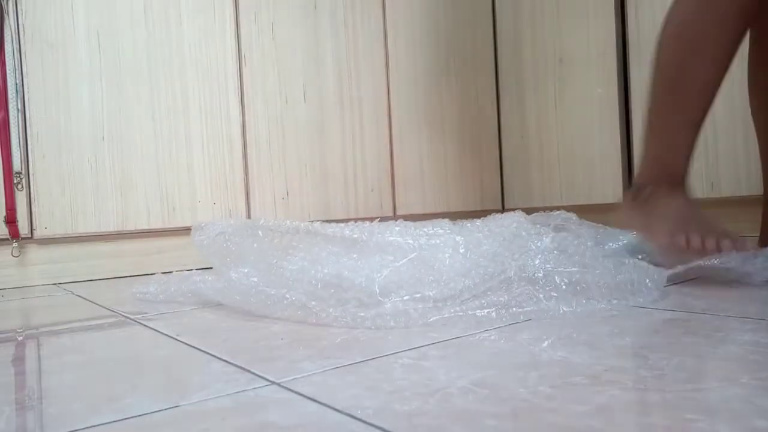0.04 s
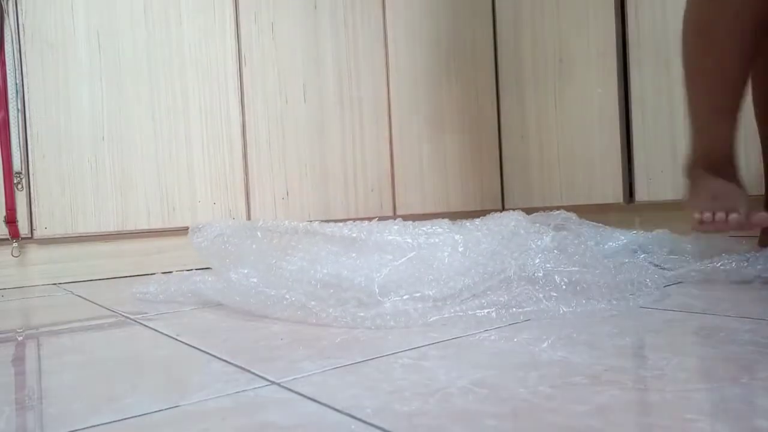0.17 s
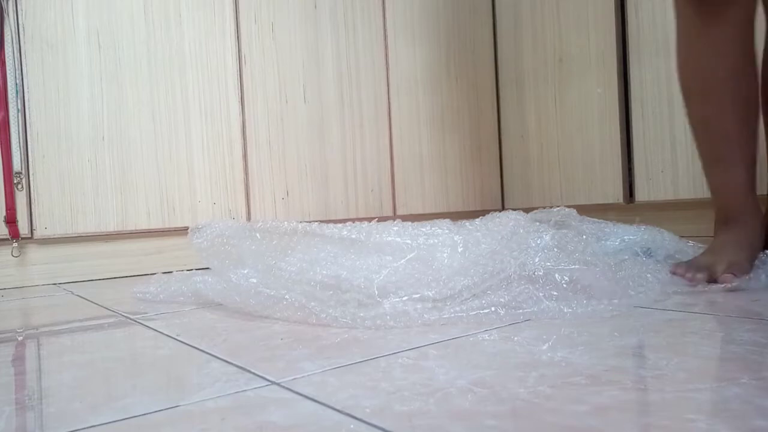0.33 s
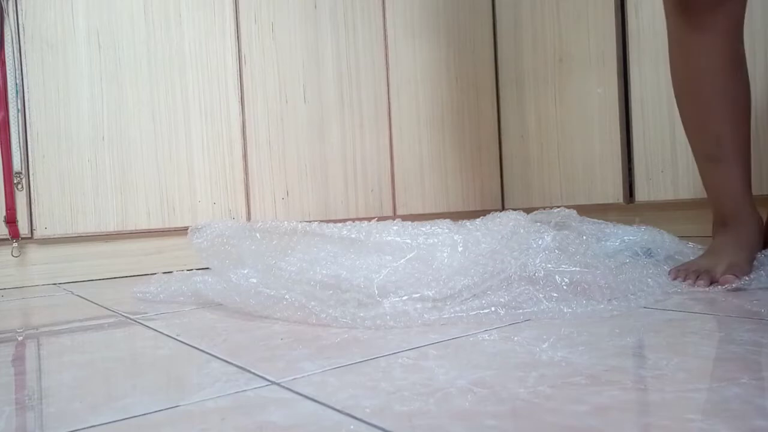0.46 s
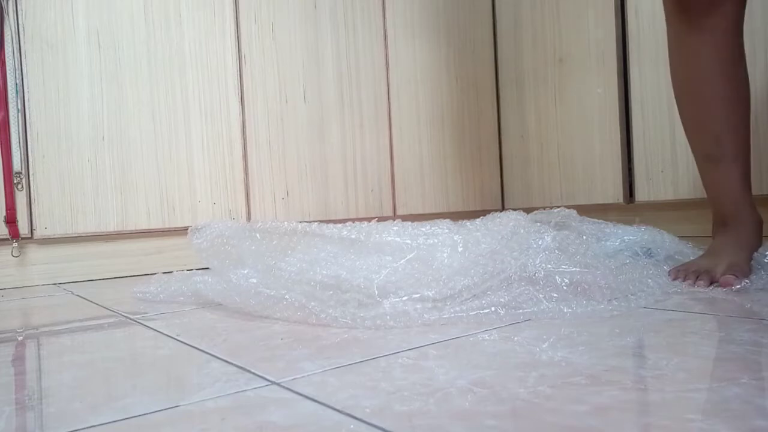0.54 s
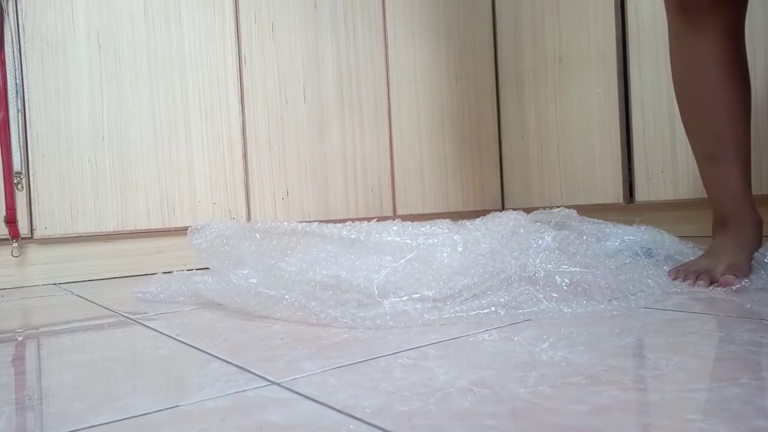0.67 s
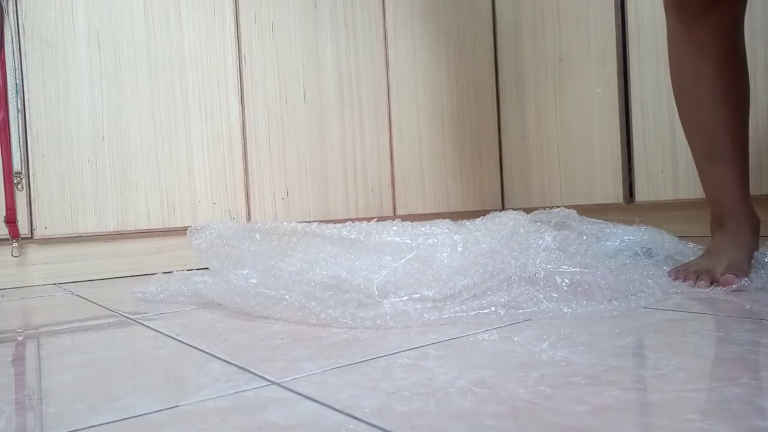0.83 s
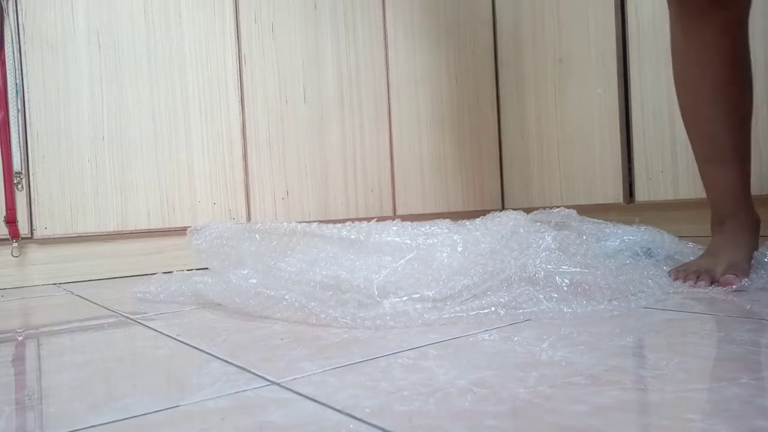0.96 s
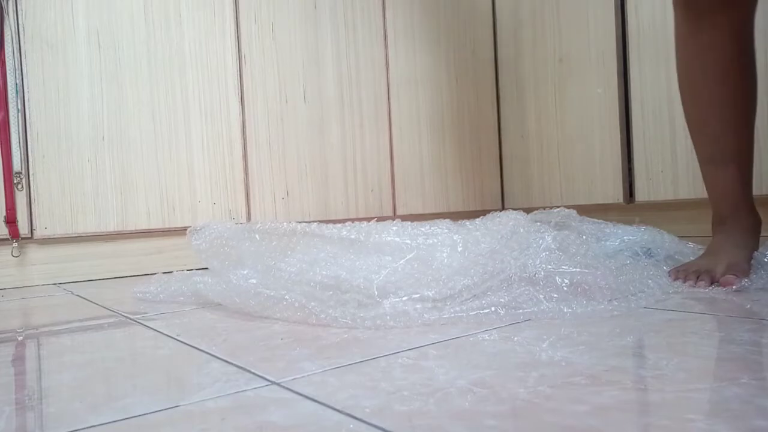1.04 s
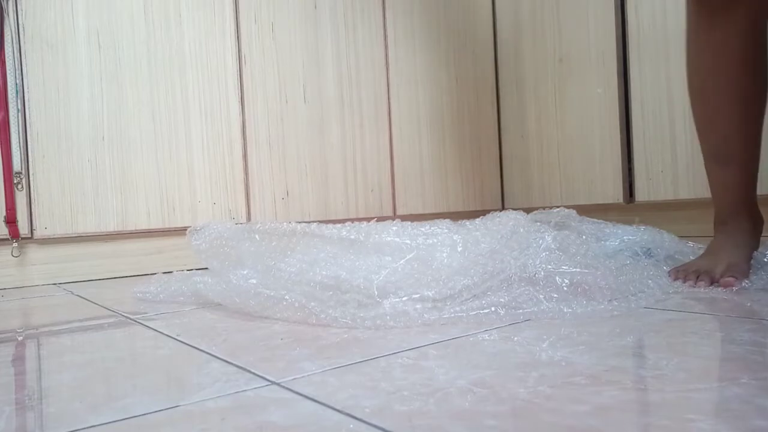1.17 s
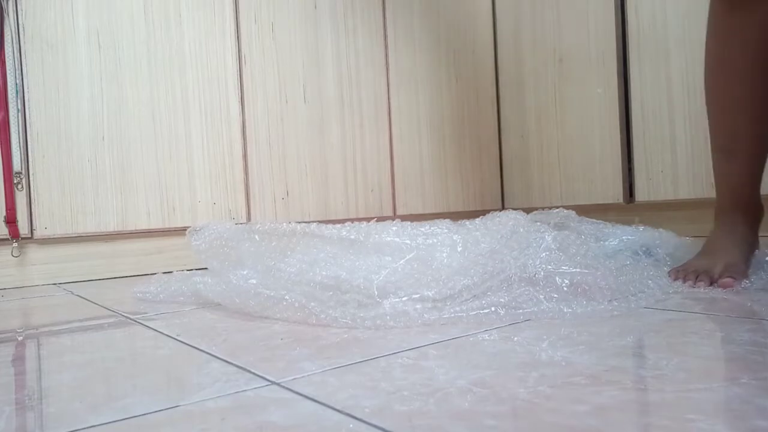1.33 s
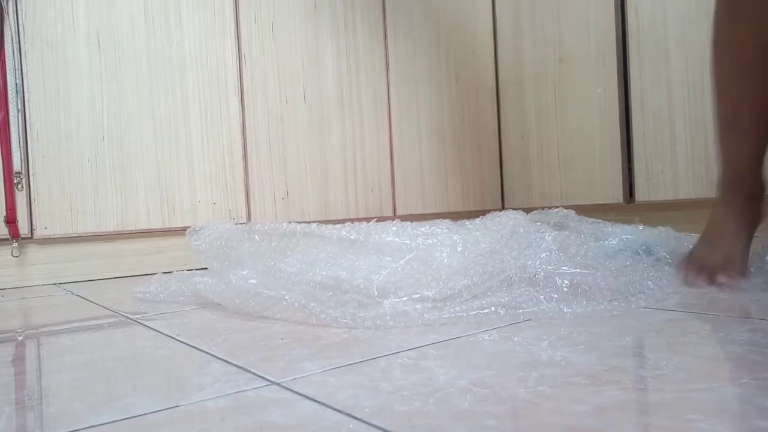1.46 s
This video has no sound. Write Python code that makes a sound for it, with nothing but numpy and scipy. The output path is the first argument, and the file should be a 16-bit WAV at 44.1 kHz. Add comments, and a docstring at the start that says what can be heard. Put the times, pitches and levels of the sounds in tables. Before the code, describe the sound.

Bubble wrap crackles and bursts under a bare foot on indoor tiles. After a rapid run of sharp pops come faint crinkles, then several more pops and soft thuds, with a short room echo.

```python
"""Film crackles and a volley of bubbles bursts as a bare foot steps on bubble wrap on a tiled floor.
Creases tick faintly as the weight shifts, then more bubbles go and the foot settles with dull thuds.
Each pop is a puff of escaping air with the ring and snap of the film; the crackle is a swarm of tiny
snaps. The hard room rings over a bed of quiet air and hum, and the heel sets its low modes booming."""
import sys
import numpy as np
from scipy import signal
from scipy.fft import rfft, irfft
from scipy.io import wavfile
from scipy.ndimage import uniform_filter1d

SR = 44100
rng = np.random.default_rng(int(sys.argv[2]) if len(sys.argv) > 2 else 0)


def file_out(sig):
    """Save sig as 16-bit WAV at sys.argv[1]."""
    # one column per channel
    cols = np.atleast_2d(sig).T
    # limit, then scale
    lim = np.clip(cols, -1, 1)
    pcm = np.round(lim * 32767).astype(np.int16)
    wavfile.write(sys.argv[1], SR, pcm)


N = 66150

# colour of the room tone (frequency [Hz], relative level [dB])
AIR_COLOUR = [(25, -25), (80, 11), (130, 3), (180, 12.5), (400, 3.5), (900, -23.5), (1150, 8.5), (1250, 7),
              (1400, -69.5), (5000, -17), (9000, -1.5), (13000, -56), (16000, -49.5)]
# decay of the reverb (frequency [Hz], t60 [s])
ROOM_DECAY = [(100, 0.01), (400, 0.4258), (1000, 0.2428), (2500, 0.66), (5000, 0.4396), (8000, .5),
              (15000, 0.3755)]
# colour of the reverb (frequency [Hz], relative level [dB])
REVERB_COLOUR = [(60, -29.5), (200, 7.5), (500, 4), (950, 3.5), (1500, -1.5), (2500, -1), (3800, 2),
                 (5300, 3.5), (6200, -0.5), (7100, 4), (8100, -2.5), (10000, 10.5), (13500, 4.5),
                 (15200, 2)]
# low room modes under the heel (frequency [Hz], level [dB], t60 [s])
ROOM_MODES = [(136, -57, 0.295), (173, -38, 0.716), (274.4, -31, 0.484), (511.7, -26.5, 0.295),
              (730, -37.5, 0.477), (1240, -46, 1.69)]
# dull colour of the sole on the floor (frequency [Hz], relative level [dB])
SOLE_COLOUR = [(30, -16), (80, -10.5), (125, 8.5), (200, -1), (300, 1.5), (520, 3), (800, 0.5),
               (1500, -4.5), (4000, -83), (16000, -87.5)]
# the foot's weight landing (time [s], level [dB], rise [s], decay [s], tilt [dB/octave])
FOOT_THUDS = [(0.107, -44.5, 0.0398, 0.164, -0.5), (0.299, -31, 0.0934, 0.0765, 5.5),
              (1.039, -30, 0.0117, 0.0934, -0.5), (1.205, -38, 0.038, 0.08, 2),
              (1.251, -35, 0.023, 0.1424, 0)]
# colour of tearing film (frequency [Hz], relative level [dB])
SNAP_COLOUR = [(100, -11), (700, -7.5), (2000, 3.5), (4500, 6.5), (7000, 13.5), (8200, 2.5), (10000, 0.5),
               (13000, -8), (15500, -0.5)]
# crackle of film squeezed under the sole (time [s], level [dB])
CRACKLE_ENVELOPE = [(0, -40.5), (.04, -85.5), (.08, -97.5), (.13, -69), (.155, -36), (.175, -30.5),
                    (.2, -44), (.26, -26.5), (.39, -24.5), (.45, -34), (.55, -47.5), (.71, -59.5),
                    (.76, -50), (.83, -81.5), (.88, -63.5), (.99, -61), (1.06, -32), (1.14, -35.5),
                    (1.2, -35), (1.25, -43.5), (1.36, -41.5), (1.42, -81), (1.5, -89.5)]
# fine fizz of stretched film (time [s], level [dB])
FIZZ_ENVELOPE = [(1.19, -69.5), (1.24, -37), (1.28, -42.5), (1.36, -51.5), (1.42, -82), (1.5, -100.5)]
# single creases flipping (time [s], level [dB], pitch [Hz], ring [ms])
CREASE_TICKS = [(.733, -17.5, 2750, 0.202), (0.7445, -18, 3600, 0.215), (0.761, -28.5, 1920, 0.99),
                (0.7641, -23.5, 2884, 0.304), (0.8068, -24.5, 2900, 0.5), (0.813, -32.5, 3190, 0.61),
                (.8455, -26, 9390, 0.442), (0.8726, -19.5, 5290, 0.324), (0.9771, -25, 5570, 0.13),
                (0.982, -31, 3610, 0.285)]
# bursting bubbles
# (time [s], level [dB], pitch [Hz], ring [ms], film ring [dB], snap [dB], reverb send [dB])
BUBBLE_POPS = [(.1783, -5.5, 2460, 0.224, -17.5, -19.5, 4), (0.1815, -5, 2115, 0.372, -23, -13.5, -1.5),
               (0.2076, -4.5, 1500, 0.445, -23.5, -28.5, -16.5), (0.2122, 11, 1920, 0.311, 1, -13.5, -3),
               (0.2278, -4, 2940, 0.407, 14, -23, 4.5), (0.2299, 0, 1750, 0.29, 8, -33, 2),
               (0.2367, 5, 2123, 0.287, -2.5, -8.5, -0.5), (0.2548, 7, 2483, 0.363, 0, -14, 2),
               (0.2937, 1, 1190, 0.44, 11.5, -8, 0), (0.3069, 6.5, 1836, 0.362, -11.5, -34.5, -4),
               (0.3126, 8, 1600, 0.441, -21, -27, -11), (0.3156, 1.5, 1356, .6, -35.5, -42, -10.5),
               (0.3418, 8.5, 3500, 0.209, -4, -9, -2.5), (0.3456, -7, 1963, 0.542, -3.5, -29.5, 12),
               (0.3667, -9, 2614, 0.356, -29.5, -1, 5.5), (0.3902, 1.5, 2610, .2, -8, -33.5, 3.5),
               (0.4218, -2, 9180, 0.5, -16, -7, -12.5), (1.0097, 6.5, 2658, 0.1834, -27.5, -43, 4.5),
               (1.0152, 3.5, 1600, 0.19, -19, -55, -25.5), (1.0404, -1.5, 3315, 0.865, -38, 2.5, -0.5),
               (1.2596, -11.5, 6010, 0.26, 9.5, -6, 2)]

PRE_ROLL_S = .2
PRE_ROLL = round(PRE_ROLL_S * SR)
TIME = (np.arange(N + PRE_ROLL) - PRE_ROLL) / SR
EARLY_POP = (-PRE_ROLL_S, -6.5, 2403.5, 0.8, 19.5, 9, 0)  # one more bubble: only its reverb is heard


def amp(db):
    """Decibels to gain."""
    return 10 ** (np.asarray(db) / 20)


def unit(x):
    """Scales to rms 1."""
    return x / np.sqrt(np.mean(x ** 2) + 1e-20)


def curve(points, hz):
    """Reads a table on a log-frequency axis."""
    f, value = np.transpose(points)
    return np.interp(np.log(hz + 1), np.log(f + 1), value)


def fader(points):
    """Gain along the timeline from a level envelope."""
    return amp(np.interp(TIME, *np.transpose(points)))


def add(mix, s, sound):
    """Mixes a sound in at s seconds."""
    part = mix[max(round(s * SR) + PRE_ROLL, 0):][:len(sound)]
    part += sound[:len(part)]


def noise(colour, size, tilt_db=0):
    """Coloured noise of rms 1, tilted per octave."""
    hz = np.fft.rfftfreq(size, 1 / SR)
    eq = amp(curve(colour, hz) + tilt_db * np.log2(hz + 1))
    return unit(irfft(rfft(rng.standard_normal(size)) * eq, size))


def narrow_noise(hz, width_hz, size):
    """Noise of rms 1 in one narrow band."""
    f = np.fft.rfftfreq(size, 1 / SR)
    phases = np.exp(2j * np.pi * rng.random(len(f)))
    return unit(irfft(phases / (1 + (2 * (f - hz) / width_hz) ** 2), size))


def scatter(grain, per_s, spread_db=3.5):
    """Fires a grain at random moments with random size and polarity."""
    hits = (rng.random(len(TIME)) < per_s / SR) * rng.choice([-1, 1], len(TIME))
    sizes = amp(spread_db * np.minimum(rng.exponential(1, len(TIME)), 4))
    return signal.oaconvolve(hits * sizes, grain)[:len(TIME)]


def room_tone(air_db=-62.5, hum_db=-62.5, hum_hz=137.7):
    """A bed of quiet air with a wavering low hum."""
    waver = 1 + 0.546 * narrow_noise(hz=3.9, width_hz=9.2, size=len(TIME))
    hum = waver * np.sin(2 * np.pi * hum_hz * TIME)
    return amp(air_db) * noise(AIR_COLOUR, len(TIME)) + amp(hum_db) * hum


def reverb(x, tail_db=2, early_gain=0.657, build_s=0.0397, ring_db=-15, ring_t60_s=0.689):
    """Reflections swell for a moment, then die band by band around one long, narrow ring."""
    t = np.arange(SR) / SR
    hz, frame_s, bands = signal.stft(rng.standard_normal(SR), SR, nperseg=256)
    bands *= amp(curve(REVERB_COLOUR, hz)[:, None] - 60 * frame_s / curve(ROOM_DECAY, hz)[:, None])
    build = np.minimum(early_gain + (1 - early_gain) * (t / build_s) ** 2, 1)
    tail = signal.istft(bands, SR, nperseg=256)[1][:SR] * build
    ring = narrow_noise(hz=1249.6, width_hz=84.8, size=SR) * amp(-60 * t / ring_t60_s) * build
    response = amp(tail_db) * tail / np.linalg.norm(tail) + amp(ring_db) * ring / np.linalg.norm(ring)
    return signal.fftconvolve(x, response)[:len(x)]


def foot(heel_s=1.262, heel_rise_s=.035):
    """The sole lands in soft thuds; the heel sets the room's low modes ringing."""
    out, t = np.zeros(len(TIME)), np.arange(SR // 2) / SR
    for s, db, rise, decay, tilt_db in FOOT_THUDS:
        envelope = np.minimum(t / rise, 1) * np.exp(-np.maximum(t - rise, 0) / decay)
        add(out, s, amp(db) * envelope * noise(SOLE_COLOUR, len(t), tilt_db))
    for hz, db, t60 in ROOM_MODES:
        envelope = np.minimum(t / heel_rise_s, 1) * amp(db - 60 * t / t60)
        add(out, heel_s, envelope * np.sin(2 * np.pi * (hz * t + rng.random())))
    return out


def radiate(wave, low_cut_hz=631.6):
    """Small patches of film give out little bass."""
    return signal.lfilter(*signal.butter(2, low_cut_hz, "high", fs=SR), wave)


def puff(hz, ring_ms, rise_ms=0.0785):
    """Air let out at once: a cycle or two of a damped wave."""
    ms = np.arange(512) / SR * 1000
    envelope = np.exp(-ms / ring_ms) * (1 - np.exp(-ms / rise_ms))
    return envelope * np.sin(2 * np.pi * hz * ms / 1000)


def snap(tilt_db=0, smear_ms=0.375):
    """The crack of the film: a pulse smeared by bending waves, treble first."""
    hz = np.fft.rfftfreq(512, 1 / SR)
    delay_s = smear_ms / 1000 * (1 - np.sqrt(hz / hz[-1]))
    phase = 2 * np.pi * np.cumsum(delay_s) * hz[1]
    eq = amp(curve(SNAP_COLOUR, hz) + tilt_db * np.log2(hz + 1))
    wave = irfft(eq * np.exp(-1j * phase))
    wave *= np.linspace(1, 0, len(wave)) ** 2
    return wave / abs(wave).max()


def crackle(snaps_per_s=1500, low_hz=1500, high_hz=6480, pitches=24):
    """Tiny snaps of many pitches as the film is squeezed, and a finer fizz as it stretches."""
    grains = [radiate(puff(hz, ring_ms=0.252)) for hz in np.geomspace(low_hz, high_hz, pitches)]
    snaps = sum(scatter(grain, snaps_per_s / pitches) for grain in grains)
    fizz = scatter(snap(tilt_db=4), per_s=990)
    return unit(snaps) * fader(CRACKLE_ENVELOPE) + unit(fizz) * fader(FIZZ_ENVELOPE)


def burst(db, hz, ring_ms, film_db, snap_db, high_cut_hz=6750):
    """A rounded puff layered with the ring and snap of the film."""
    body = puff(hz, ring_ms) + amp(film_db) * puff(hz=4037, ring_ms=0.1309)
    rounded = signal.lfilter(*signal.butter(2, high_cut_hz, fs=SR), body)
    return amp(db) * radiate(rounded + amp(snap_db) * snap())


def crease_tick(db, hz, ring_ms, slip_db=-4, slip_decay_ms=3.7):
    """A crease does not flip at once: a quick run of smaller slips follows the first click."""
    click = burst(db, hz, ring_ms, film_db=-9.5, snap_db=-10.5)
    ms = np.arange(1500) / SR * 1000
    slips = rng.standard_normal(len(ms)) * np.exp(-ms / slip_decay_ms)
    return np.convolve(click, (ms == 0) + amp(slip_db) * slips / np.linalg.norm(slips))


def pops_and_ticks(tick_send_db=-1):
    """Bubbles burst and creases flip under the foot; gives the direct sound and the reverb send."""
    direct, send = np.zeros((2, len(TIME)))
    hits = [(s, burst(*shape), send_db) for s, *shape, send_db in BUBBLE_POPS + [EARLY_POP]]
    hits += [(s, crease_tick(*shape), tick_send_db) for s, *shape in CREASE_TICKS]
    for s, sound, send_db in hits:
        add(direct, s, sound)
        add(send, s, sound * amp(send_db))
    return direct, send


def scene(crackle_send_db=-1):
    """Mono mix: pops, ticks and crackle with their reverb, over the foot and the room tone."""
    pops, pop_send = pops_and_ticks()
    film = crackle()
    reflections = reverb(pop_send) + amp(crackle_send_db) * reverb(film)
    mix = pops + film + reflections + foot() + room_tone()
    return mix[None, PRE_ROLL:]


def suppress_noise(x, split_hz=1600, threshold_db=-50, knee_db=4, cut_db=-10):
    """A soft gate turns the treble down whenever it is quiet."""
    treble = signal.filtfilt(*signal.butter(2, split_hz, "high", fs=SR), x)
    level_db = 10 * np.log10(abs(uniform_filter1d(treble ** 2, size=900)) + 1e-12)
    closed = .5 + .5 * np.tanh((threshold_db - level_db) / knee_db / 2)
    return x + treble * (amp(cut_db * closed) - 1)


def record(dry, dip_s=1.2558, dip_half_s=.0025, dip_db=-14, ceiling=.97, high_cut_hz=15700):
    """Noise suppression, one brief dip in level, overload on the loudest pops, then a steep high cut."""
    dip = amp(dip_db * np.exp(-((TIME[PRE_ROLL:] - dip_s) / dip_half_s) ** 4))
    clipped = np.clip(suppress_noise(dry) * dip, -ceiling, ceiling)
    high_cut = signal.firwin(401, high_cut_hz, window=("kaiser", 8), fs=SR)
    return signal.oaconvolve(clipped, high_cut[None], "same")


dry = scene()
out = record(dry)
file_out(out)
```